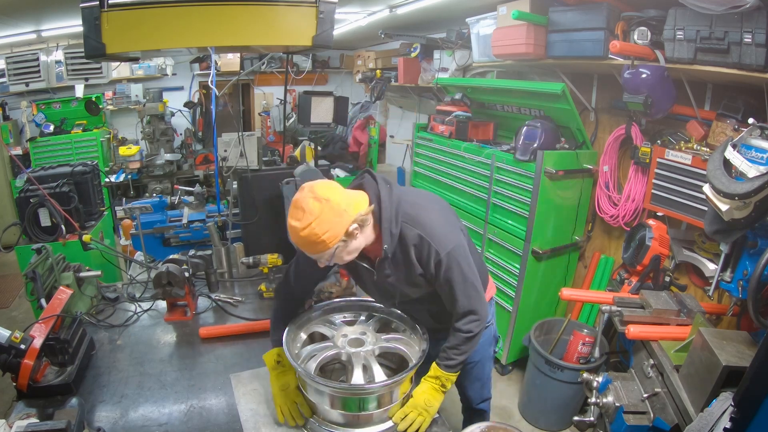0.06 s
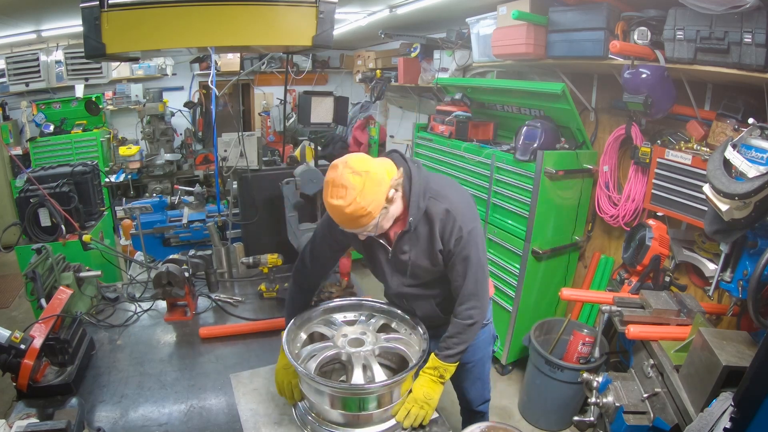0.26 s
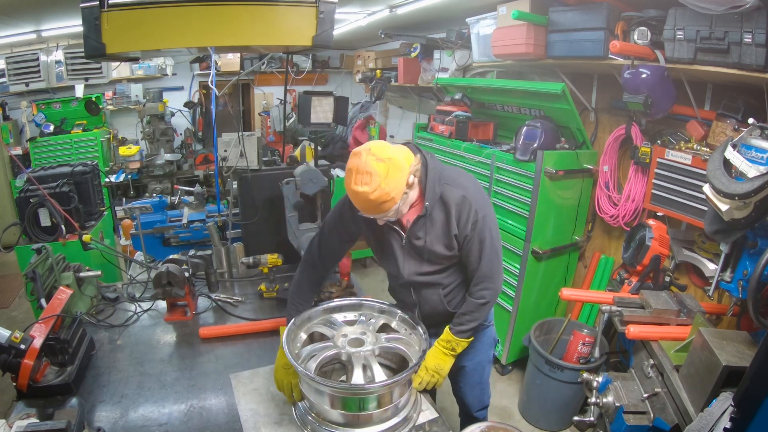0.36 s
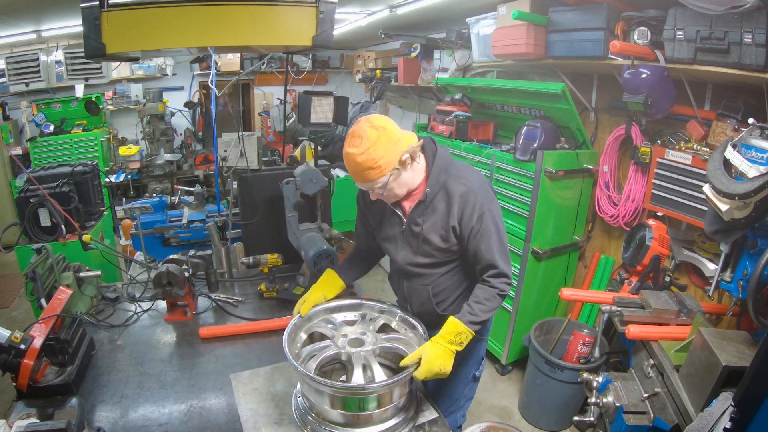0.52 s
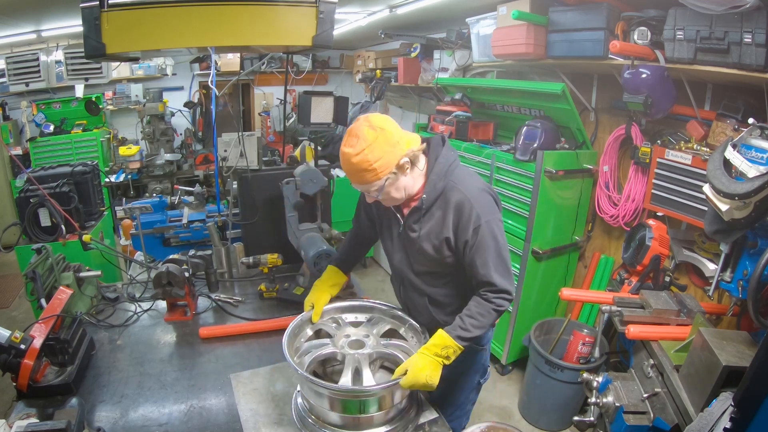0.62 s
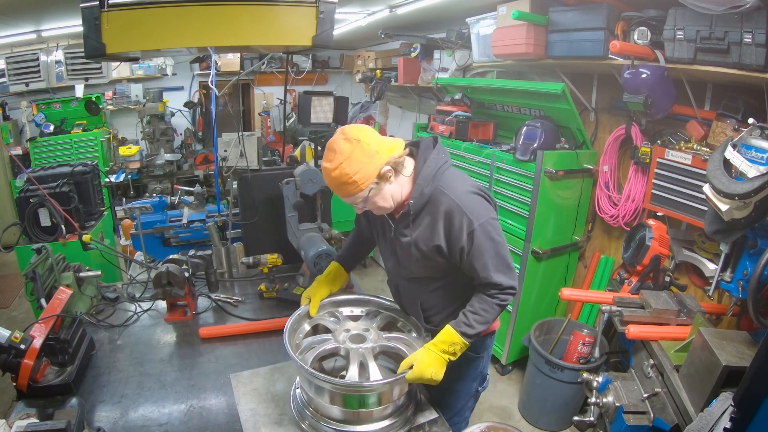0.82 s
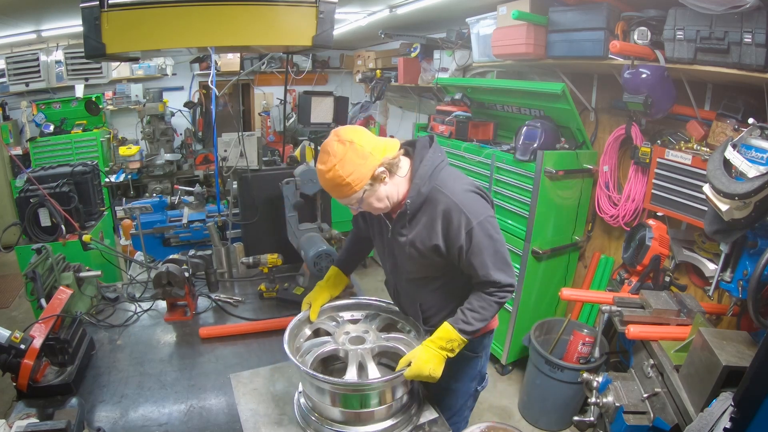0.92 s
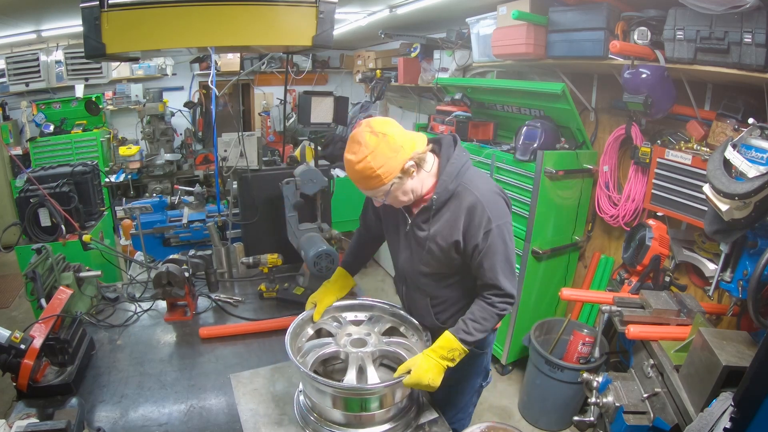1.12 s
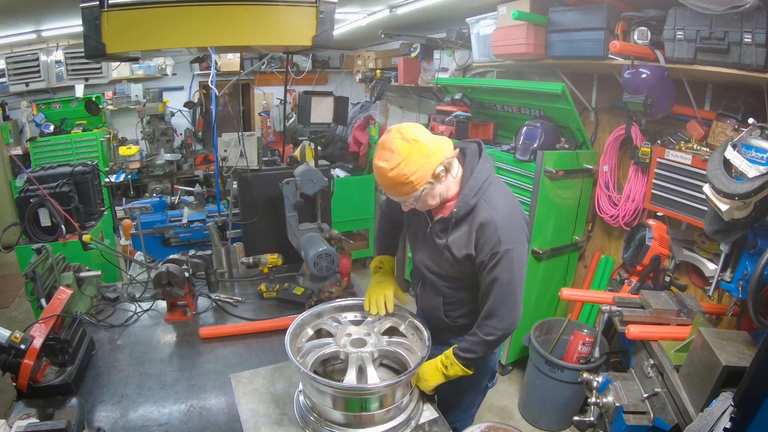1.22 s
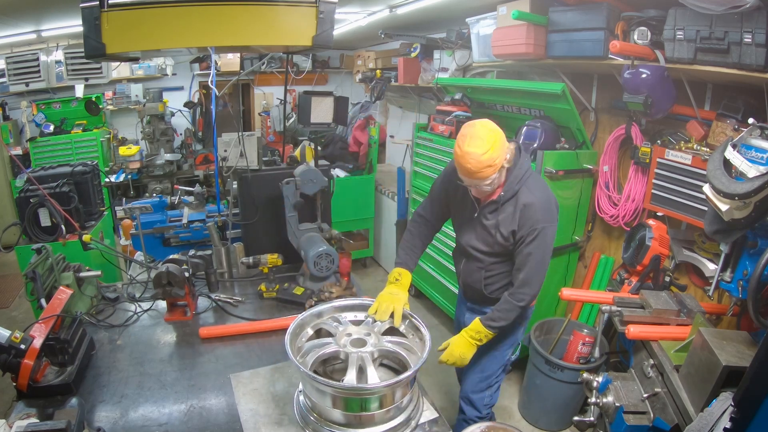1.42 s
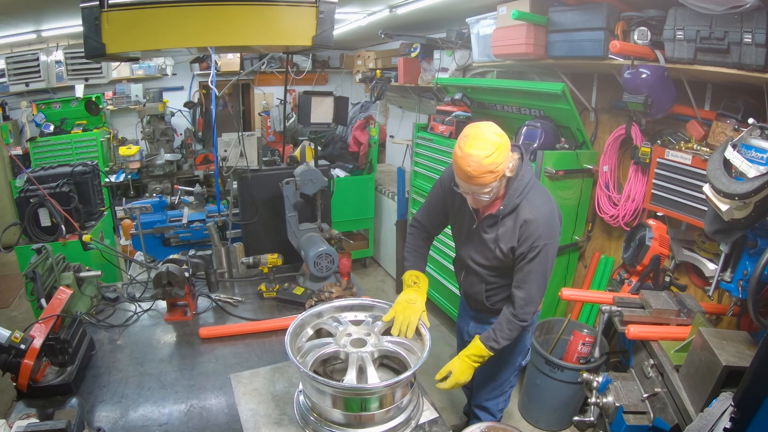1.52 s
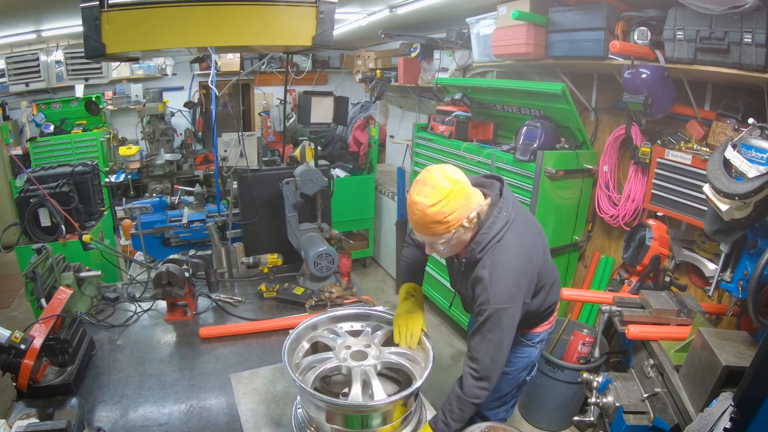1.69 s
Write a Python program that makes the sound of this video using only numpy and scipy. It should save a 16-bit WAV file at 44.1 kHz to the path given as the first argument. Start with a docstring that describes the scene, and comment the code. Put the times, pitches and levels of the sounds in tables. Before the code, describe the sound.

A metal wheel rim judders on a steel workbench in a quick run of briefly ringing clacks, then settles with softer knocks. Gloves brush it and it knocks once more, in a dry workshop with faint hum.

```python
"""Wheel rim on a steel workbench.

An alloy rim judders in a quick run of clacks, settles with softer knocks and is nudged once more.
Each clack is a flurry of tiny metal contacts that rings the hand-damped rim. Bench and rim thud
under the weight and the hands; gloves brush the metal. Dry, cluttered workshop with faint machine tones."""
import sys
import numpy as np
from scipy import signal
from scipy.fft import rfft, irfft
from scipy.io import wavfile
from scipy.ndimage import map_coordinates

SR = 44100
rng = np.random.default_rng(int(sys.argv[2]) if len(sys.argv) > 2 else 0)


def put_to_file(sound):
    """Save the sound as 16-bit audio at rate SR, in the file named by the first command-line argument."""
    columns = np.atleast_2d(sound).T  # one column per channel
    safe = np.clip(columns, -1, 1)
    whole_steps = np.round(safe * 32767)
    wavfile.write(sys.argv[1], SR, whole_steps.astype(np.int16))


N = 77175
TIME_S, FREQS_HZ = np.arange(N) / SR, np.fft.rfftfreq(N, 1 / SR)


def amp(db):
    """Decibels to gain."""
    return 10 ** (np.asarray(db) / 20)


def unit(x):
    """Scale to rms 1."""
    return x / np.sqrt(np.mean(x ** 2) + 1e-20)


def read(points, hz):
    """Interpolate a table on a log-frequency axis."""
    freq_hz, value = np.transpose(points)
    return np.interp(np.log(hz + 1), np.log(freq_hz + 1), value)


def add(mix, start_s, sound):
    """Mix in a stereo sound."""
    part = mix[:, round(start_s * SR):][:, :sound.shape[1]]
    part += sound[:, :part.shape[1]]


def swell(x, rise, fall):
    """Two-sided Gaussian, peak at x = 0."""
    return np.exp(-.5 * (x / np.where(x < 0, rise, fall)) ** 2)


def pair(spectra, correlation):
    """Correlate two independent channels."""
    c = np.clip(correlation, -1, 1)
    return np.array([spectra[0], c * spectra[0] + np.sqrt(1 - c ** 2) * spectra[1]])


def noise(gain, correlation):
    """Shaped stereo noise, rms 1."""
    white = rfft(rng.standard_normal((2, N)))
    return unit(irfft(pair(white, correlation) * gain, N))


def minimum_phase(db):
    """Response with these levels that rings only after it is struck."""
    log_gain = np.log(amp(np.concatenate([db, db[-2:0:-1]])))
    return np.exp(np.conj(signal.hilbert(log_gain)))[:len(db)]


def background(air_db=-62.5, correlation=0.14):
    """Low room noise; narrow noise bands make wavering machine tones."""
    air_spectrum = [(12, -29), (20, 0), (146, -22.5), (193, -30), (367, -18), (574, -29.5), (1190, -28.5),
                    (2020, -31), (2200, -32.5), (7310, -33.5), (9400, -38), (13200, -30), (16000, -44)]  # freq_hz, density_db
    machine_tones = [(120, -80, 5.5), (350, -86, 14), (1110, -78.5, 8), (1683, -80, 20), (7500, -78.5, 380),
                     (12100, -91.5, 60), (13300, -83.5, 700)]  # pitch_hz, level_db, width_hz
    hum = sum(amp(db) * noise(swell(FREQS_HZ - hz, width_hz / 2, width_hz / 2), correlation)
              for hz, db, width_hz in machine_tones)
    return hum + amp(air_db) * noise(amp(read(air_spectrum, FREQS_HZ)), correlation)


def room(x, level_db=-10.5, delay_s=.007):
    """Short diffuse tail from the bench and the crowded walls."""
    decay = [(60, 0.14), (250, 0.084), (1000, 0.11), (4000, 0.082), (12000, 0.039)]  # freq_hz, t60_s
    shape = (2, 16384)
    reflections = rng.choice([-1., 1.], shape) * (rng.random(shape) < .1)
    hz, t, frames = signal.stft(reflections, SR, nperseg=256)
    tail = signal.istft(frames * amp(-60 * t / read(decay, hz)[:, None]), SR, nperseg=256)[1]
    tail /= np.linalg.norm(tail, axis=1, keepdims=True)
    out = np.zeros((2, N))
    add(out, delay_s, signal.fftconvolve(x, tail, axes=1))
    return amp(level_db) * out


def gloves():
    """Gloves brush the rim: short noise swells of varying brightness."""
    brushes = [(0.944, -56.5, 0.023, 0.016, -3), (1.09, -64.5, 0.014, 0.015, -3),
               (1.25, -49.5, .014, 0.03, 5), (1.342, -43.5, 0.035, 0.0099, 0.5),
               (1.414, -59.5, 0.012, 0.037, 3), (1.512, -42, 0.018, 0.0093, 1),
               (1.725, -66, .012, 0.022, -5)]  # peak_s, level_db, rise_s, fall_s, tilt_db_per_octave
    glove_spectrum = [(88, -63), (150, -6), (716, -3), (821, -2.5), (979, -1.5), (2650, -10), (4580, -18.5),
                      (14000, -35), (16000, -46)]  # freq_hz, density_db
    out = np.zeros((2, N))
    for peak_s, db, rise_s, fall_s, tilt in brushes:
        colour = amp(read(glove_spectrum, FREQS_HZ) + tilt * np.log2(FREQS_HZ + 1))
        out += amp(db) * swell(TIME_S - peak_s, rise_s, fall_s) * noise(colour, correlation=0.058)
    return out


def thuds(rise_s=0.0011):
    """Low, heavily damped swings of bench and rim under the weight and the hands."""
    bumps = [(.144, -49.5, 396, 0.0053), (0.251, -28, 252, 0.0041), (0.404, -26, 66.3, 0.012),
             (0.602, -37, 62, .014), (.948, -42, 460.6, 0.0033), (1.247, -39, 273, 0.0036),
             (1.314, -30.5, 258, 0.008)]  # peak_s, level_db, pitch_hz, fall_s
    stereo_rad = np.array([[0], [np.pi / 2]])
    out = np.zeros((2, N))
    for peak_s, db, hz, fall_s in bumps:
        t = TIME_S - peak_s
        swing = np.sqrt(2) * np.sin(2 * np.pi * (hz * t + rng.random()) + stereo_rad)
        out += amp(db) * swell(t, rise_s, fall_s) * swing
    return out


def bench_response(hz, ripple_db=5.5, spacing_hz=140.8, full_ripple_hz=5000):
    """Broad colour of the bench, rippled by dense, short resonances."""
    bench_spectrum = [(25, -19), (45, -8), (65, -1), (95, -8), (160, -3.5), (235, -3.5), (350, -12),
                      (520, -6.5), (700, -7.5), (890, -1), (1150, -5.5), (1700, 0.5), (2600, -3),
                      (3500, -5), (4300, -7), (6600, -13.5), (9500, -20.5), (13500, -26.5), (15500, -28.5),
                      (16500, -45)]  # freq_hz, density_db
    ripple = map_coordinates(rng.standard_normal(len(hz)), [hz / spacing_hz], order=3)
    ripple *= np.minimum(hz / full_ripple_hz, 1)
    return minimum_phase(read(bench_spectrum, hz) + ripple_db * np.tanh(ripple))


def flurry(t, band_db, chatter_db):
    """Tiny contacts swell and die within milliseconds; weaker chatter follows. The bench colours both."""
    edges_hz = [30, 300, 1200, 5000, 17000]  # edges of bass, body, mid, treble
    stereo_correlation = [(50, 0.7), (200, -.1), (1000, 0.01), (4000, 0), (12000, 0)]  # freq_hz, correlation
    rise_s, fall_s, chatter_t60_s = 0.0038, 0.0048, 0.12
    contacts_per_s, spread_db = 12000, 2
    hz, shape = np.fft.rfftfreq(len(t), 1 / SR), (2, len(t))
    hump = np.exp(-.5 * abs(t / np.where(t < 0, rise_s, fall_s)) ** 2.42)  # squarer than a Gaussian
    chatter = (t > 0) * amp(chatter_db - 60 * abs(t) / chatter_t60_s)
    force = np.maximum(hump, chatter)
    contacts = (rng.random(shape) < contacts_per_s / SR) * rng.choice([-1, 1], shape)
    strength = amp(spread_db * rng.standard_normal(shape))
    spectrum = pair(rfft(contacts * strength * force), read(stereo_correlation, hz)) * bench_response(hz)
    out = np.zeros(shape)
    for low_hz, high_hz, db in zip(edges_hz, edges_hz[1:], band_db):
        band = 1 / (1 + (hz / high_hz) ** 8) - 1 / (1 + (hz / low_hz) ** 8)
        out += amp(db) * unit(irfft(spectrum * band))
    return out * np.sqrt(np.mean(force ** 2))


def ring(t, centre_hz, width_octaves, far_db=-13, rise_s=0.00056):
    """Damped rim modes; the contact point favours those near centre_hz."""
    rim_modes = [(507, -9, 0.033), (640, -6.5, .08), (900, 2.5, 0.061), (917, 1.5, 0.091),
                 (978, -0.5, 0.098), (1340, -0.5, 0.16), (1424, 0, 0.086), (1637, 2, .09), (1756, 2, 0.067),
                 (1860, 0.5, .1), (2227, 1, 0.14), (2293, -1, 0.097), (2705, -6, .07), (4161, 7.5, 0.062)]  # pitch_hz, level_db, t60_s
    hz, db, t60_s = np.transpose(rim_modes)[:, :, None]
    nearness = swell(np.log2(hz / centre_hz), width_octaves, width_octaves)
    gain = amp(db + far_db * (1 - nearness))
    stereo_rad = np.array([0, np.pi / 2])[:, None, None] * rng.choice([-1, 1], hz.shape)
    decay = amp(-60 * np.maximum(t, 0) / t60_s)
    modes = gain * decay * np.sin(2 * np.pi * (hz * t + rng.random(hz.shape)) + stereo_rad)
    onset = (1 + np.tanh(t / rise_s)) / 2
    return onset * modes.sum(1) / np.sqrt(np.sum(gain ** 2) / 2)


def rim_clacks():
    """Rim strikes bench. Returns two layers: contact flurries and the rings they leave."""
    # peak_s, mid_db, bass_db, body_db, treble_db, ring_db, centre_hz, width_octaves, chatter_db
    clacks = [(0.228, -49.5, -10.5, 3.5, -7, -12, 1590, .3, -13),
              (0.2522, -21, -8.5, -1, -0.5, 0.5, 1760, 0.065, -17.5),
              (0.2892, -20, -28.5, -10, -10.5, 4, 2030, 1, -12.5),
              (0.3302, -18.5, -15.5, -3, -2.5, -1.5, 1670, 0.1, -14),
              (.369, -23, -29, -5, 0, -8, 931, 0.17, -15), (0.4049, -18.5, -14, -3, 1, -7, 873, 0.14, -14),
              (.441, -24, -28, -10.5, 4.5, -4.5, 1850, .1, -16.5),
              (0.4501, -27.5, -23, -1.5, -5, 9.5, 860, 0.13, -18),
              (0.5176, -22, -12.5, -1.5, -0.5, -6.5, 890, .3, -18.5),
              (.5487, -22.5, -16.5, 5, 3, -6.5, 593, 0.22, -19.5),
              (0.5866, -18, -13.5, -0.5, -1.5, -5.5, 1650, 0.38, -27),
              (0.6143, -20, -12, -3, -1.5, -18, 1610, .5, -18.5),
              (.719, -32.5, -12.5, -2, -4, -15.5, 1307, 0.38, -15.5),
              (0.7399, -29.5, -16, -3, -17, -2, 1380, .14, -19.5),
              (.948, -47.5, -10, 2, -35, -9, 1336, .1, -17),
              (1.306, -32.5, -9, 2, -9.5, 2.5, 1010, 0.1, -17.5),
              (1.3163, -25.5, -12.5, -4.5, -5, 0.5, 1170, 0.96, -12)]  # mid is 1.2-5 kHz; the other levels are relative to it
    contacts, rings = np.zeros((2, 2, N))
    t = np.arange(-1024, 9216) / SR
    for peak_s, mid_db, bass_db, body_db, treble_db, ring_db, centre_hz, octaves, chatter_db in clacks:
        start_s = peak_s + t[0]
        add(contacts, start_s, amp(mid_db) * flurry(t, [bass_db, body_db, 0, treble_db], chatter_db))
        add(rings, start_s, amp(mid_db + ring_db) * ring(t, centre_hz, octaves))
    return contacts, rings


def scene(tonal_send_db=-6):
    """Workshop mix; the room mostly smears the sharp sounds."""
    contacts, rings = rim_clacks()
    sharp, tonal = contacts + gloves(), rings + thuds()
    return sharp + tonal + room(sharp + amp(tonal_send_db) * tonal) + background()


def record(dry, cutoff_hz=16300):
    """Steep low-pass band limit."""
    taps = signal.firwin(511, cutoff_hz, window=("kaiser", 9), fs=SR)
    return signal.oaconvolve(dry, taps[None], "same", axes=1)


dry = scene()
out = record(dry)
put_to_file(out)
```